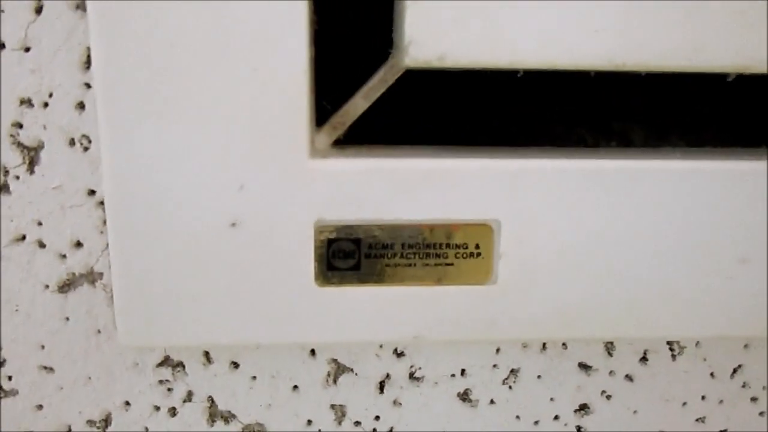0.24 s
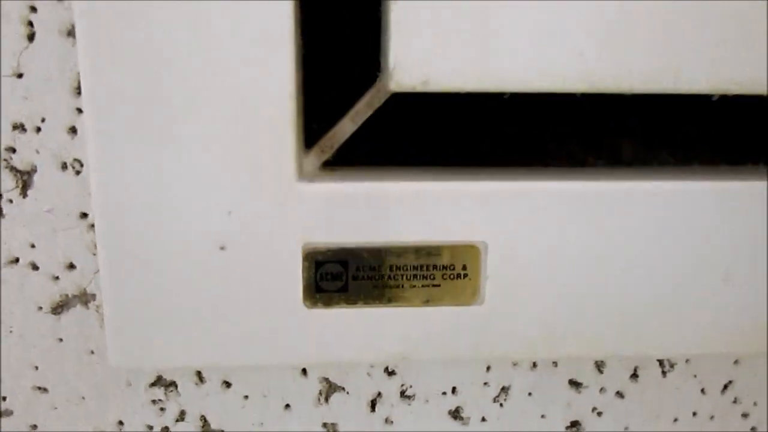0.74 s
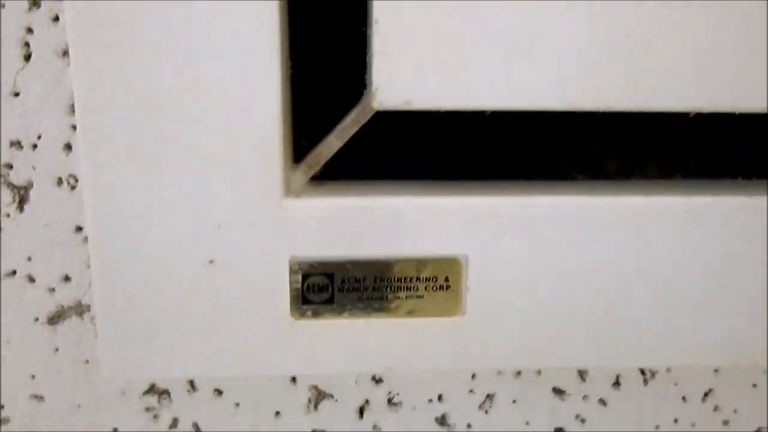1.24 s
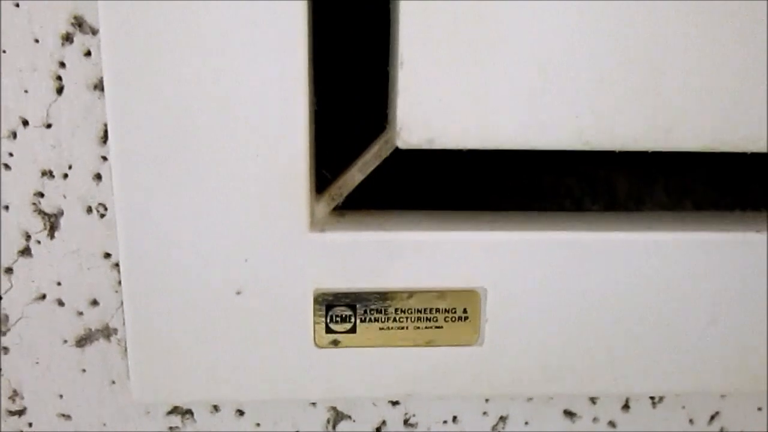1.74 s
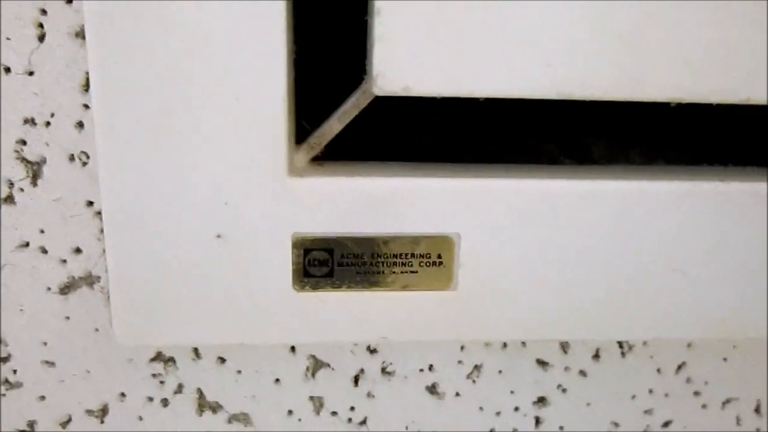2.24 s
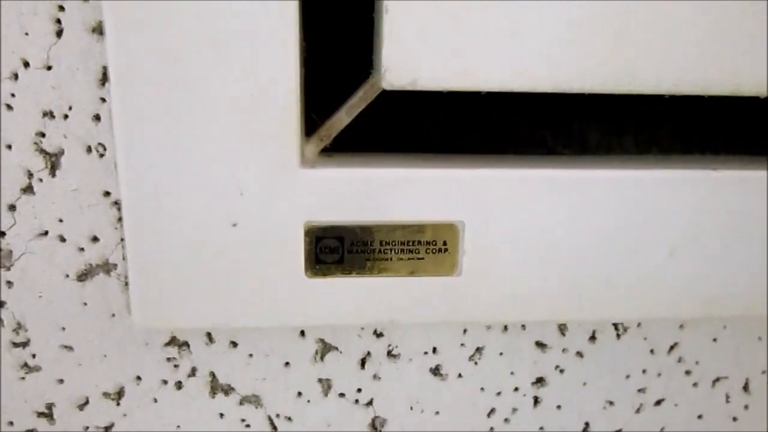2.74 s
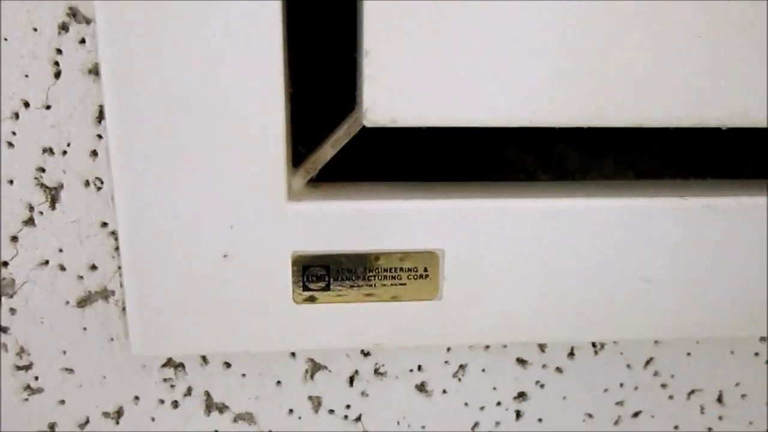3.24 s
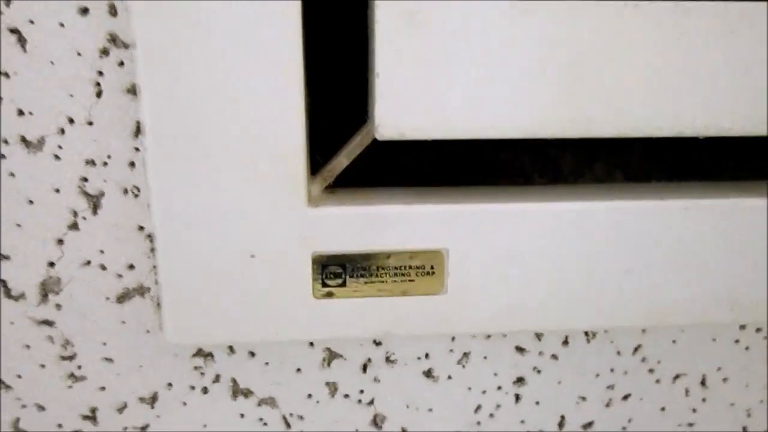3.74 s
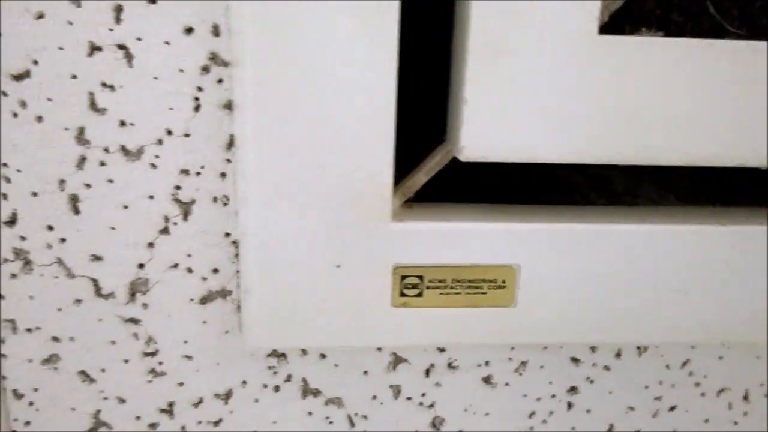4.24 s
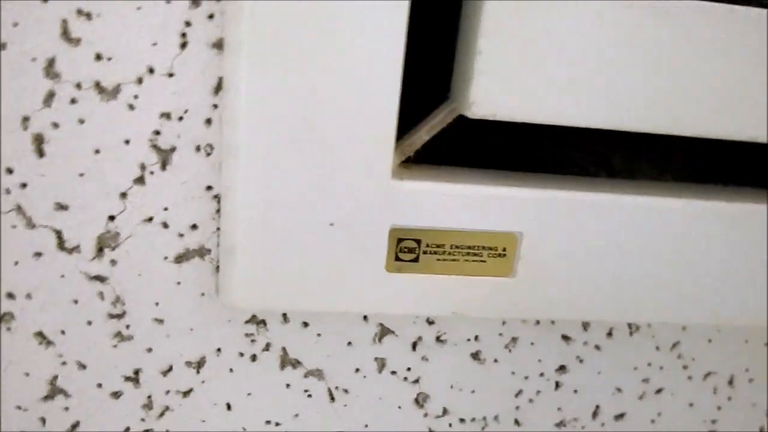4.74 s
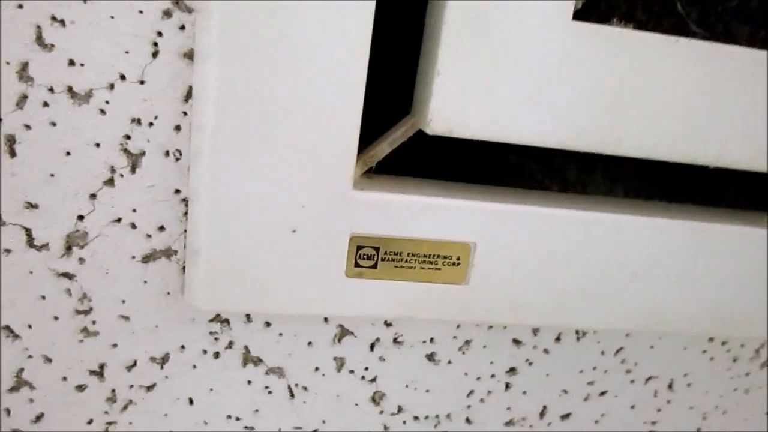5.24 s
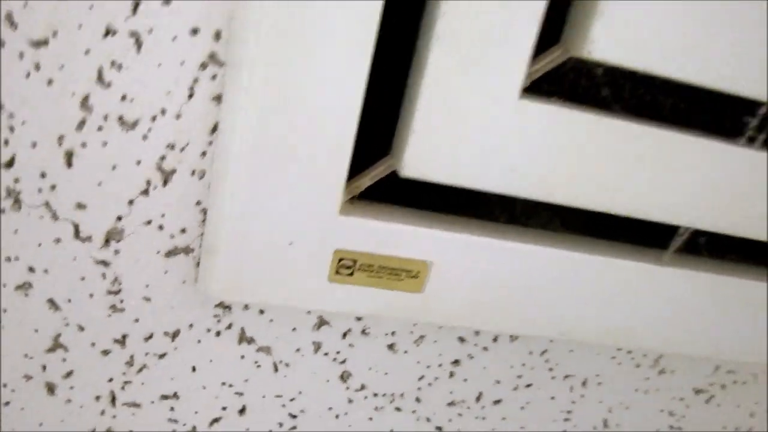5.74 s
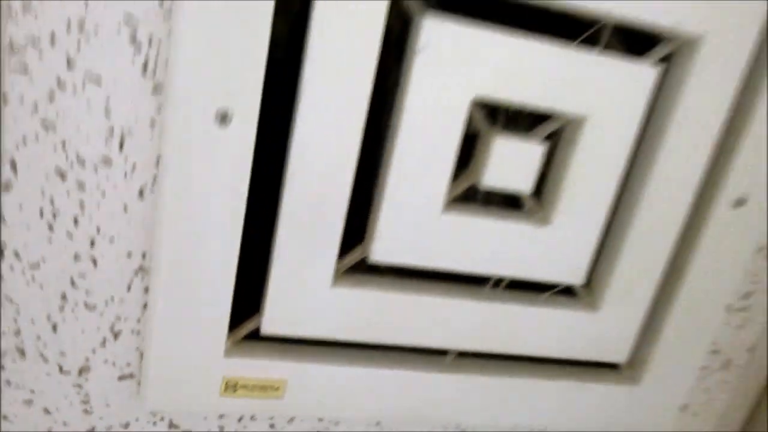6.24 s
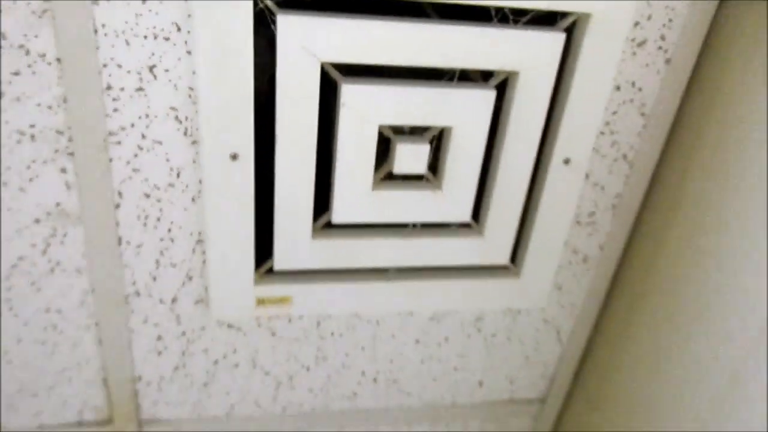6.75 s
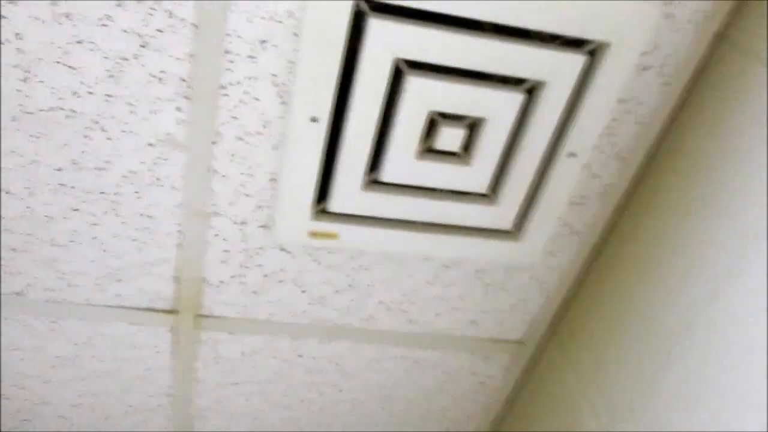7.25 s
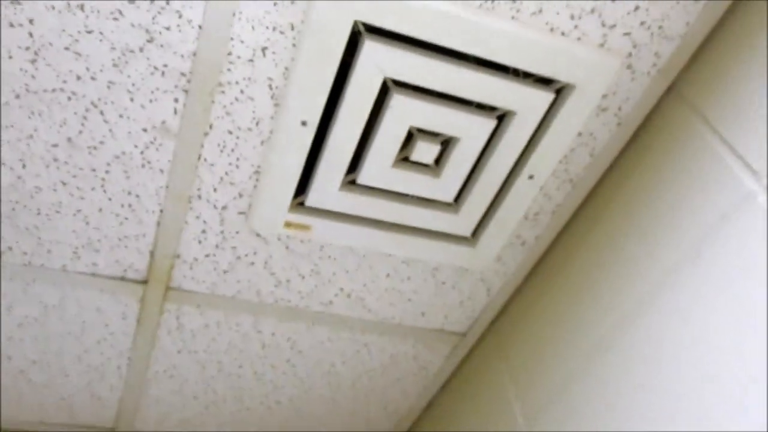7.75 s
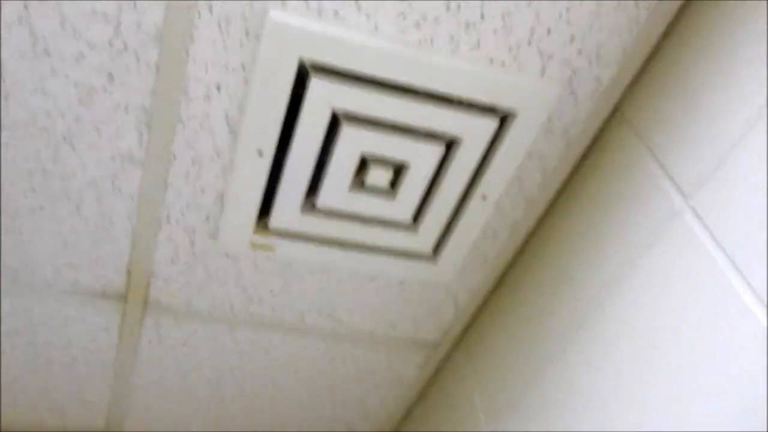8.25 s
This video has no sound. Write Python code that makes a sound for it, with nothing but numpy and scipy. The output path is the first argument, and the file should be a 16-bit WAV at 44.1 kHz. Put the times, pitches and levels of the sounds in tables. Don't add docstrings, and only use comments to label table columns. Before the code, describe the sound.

From 0 s an exhaust fan is already running at constant speed, close to a hand-held camera microphone. A strong low hum near 120 Hz dominates, with deeper rotation tones around 26 turns per second giving a rough, throbbing flutter. Broad low air rush and a softer grille-coloured hiss surround it. A loose metal part rattles faintly every turn, too fast to count; it stirs at 2.9 s, jolts hardest around 3.4 s, then settles by about 4.2 s. A very faint high whine sits above. From 6 s the camera retreats: small clicks, a bright scrape with a low thump near 6.14 s, more ticks around 6.4 s. Sharp clicks cluster from 6.95 to 7.5 s, loudest at 7.12 s, after which everything ducks slightly and slowly recovers. Air and rattle are duller further off; light rubs and taps continue to 8.4 s, the hum never stopping.

```python
import sys
import numpy as np
from scipy import signal
from scipy.fft import rfft, irfft, next_fast_len
from scipy.io import wavfile
from scipy.ndimage import map_coordinates

SR = 44100
rng = np.random.default_rng(int(sys.argv[2]) if len(sys.argv) > 2 else 0)


def volts_from_decibels(level):
    exponent = np.asarray(level, float) / 20
    return 10 ** exponent


def inscribe(sig):
    pcm = np.round(np.clip(np.atleast_2d(sig).T, -1, 1) * 32767)
    wavfile.write(sys.argv[1], SR, pcm.astype(np.int16))


N = 374850
PULL_HZ = 120.04


def unit(x):
    return x / np.sqrt(np.mean(x ** 2) + 1e-20)


def along(points, hz):
    f, value = np.transpose(points)
    return np.interp(np.log(hz + 1), np.log(f + 1), value)


def curve(points, step=1):
    s, value = np.transpose(points)
    return np.interp(np.arange(0, N, step) / SR, s, value)


def wobble(rate, size=N, step=1):
    knots = rng.standard_normal(int(N * rate / SR) + 4)
    return map_coordinates(knots, [np.arange(size) * step * rate / SR])


def filtered(x, response):
    size = x.shape[-1]
    padded = next_fast_len(size + min(size, 8192))
    spectrum = rfft(x, padded) * response(np.fft.rfftfreq(padded, 1 / SR))
    return irfft(spectrum, padded)[..., :size]


def ringing(hz, width_hz):
    return lambda f: 1j * f * width_hz / (hz * hz - f * f + 1j * f * width_hz + 1e-9)


# t/s, rate/(turns per s)
SHAFT_SPEED = [(0, 25.81), (1, 25.845), (2, 25.862), (3, 25.862), (4, 25.847), (5, 25.821), (6, 25.788),
               (7, 25.748), (8.5, 25.69)]


def turns():
    return np.cumsum(curve(SHAFT_SPEED)) / SR - 0.094


# t/s, share of the way 0-1
AWAY = [(0, 0.01), (3.5, 0.01), (5.8, 0.09), (6.4, 0.3), (7.05, 0.77), (7.25, 0.83), (7.8, 0.97),
        (8.5, 0.8)]


def distance():
    return np.clip(curve(AWAY), 0, 1)


# t/s, level/dB
HUM = [(0, -15.5), (2.5, -15.5), (4, -16), (5.9, -17.5), (6.7, -15.5), (8.5, -15.5)]
# t/s, loss as level/dB
FACING = [(0, 0), (3, 0), (5.9, -0.5), (6.3, -1), (6.6, -4), (7.1, -3), (7.7, -1.5), (8.2, -5), (8.5, -6)]
ORDER_NEAR = [-38, -44.5, -32, -49, -47, -48.5, -50, -39, -43.5, -36, -40.5, -52, -48, -59, -50, -48, -53.5,
              -51, -61, -52, -56, -51, -43.5, -46.5, -46.5]
ORDER_FAR = [-36, -49, -33.5, -50, -49, -53, -52, -40.5, -50, -43.5, -44.5, -60, -51, -61, -60, -37.5, -52,
             -55, -57, -67, -54, -45.5, -66, -69, -57]
SIDE_NEAR = [
    [-68, -59, -45.5, -41.5, -89, -36, -44.5, -60, -65, -41.5, -44.5],
    [-38, -73, -53, -40, -26.5, -35, -45.5, -34.5, -44.5, -44.5, -42.5],
    [-44.5, -69, -37.5, -42, -44.5, -40, -43, -45, -56, -59, -54],
    [-48.5, -56, -45, -40.5, -57.5, -49.5, -53, -47, -55, -52, -51.5],
    [-67, -51, -52.5, -53, -55, -61, -48, -42.5, -56, -54, -66],
]
SIDE_FAR = [
    [-58, -62, -44, -49, -89, -54, -41, -67, -43, -73, -72],
    [-54, -56, -41, -35.5, -34.5, -66, -55, -43.5, -40, -49, -63],
    [-41, -47, -46.5, -55, -43.5, -63, -50, -52, -55, -66, -44],
    [-40, -54, -59, -44.5, -50, -48, -57, -56, -58, -58, -68],
    [-69, -56, -56, -70, -54, -57, -67, -73, -77, -73, -66],
]
# f/Hz, width/Hz, lift as level/dB
HALFWAY_MODES = [
    (26, 20, -8),
    (284, 10, 5.5),
    (310, 8.4, 10),
]


def motor():
    coarse = 16
    away = distance()[::coarse]
    shaft = turns()[::coarse]
    pull = PULL_HZ * np.arange(0, N, coarse) / SR
    overtone_db = -0.5 + 0.48 * curve(FACING, coarse)

    def line(cycles, near_db, far_db):
        hz = (cycles[-1] - cycles[0]) * SR / N
        mode_db = sum(db * abs(ringing(top, width)(hz)) ** 2 for top, width, db in HALFWAY_MODES)
        level_db = near_db + away * (far_db - near_db)
        level_db = level_db + mode_db * np.sin(np.pi * away) ** 2
        level_db = level_db + 0.6 * wobble(1.545, len(pull), coarse)
        return volts_from_decibels(level_db) * np.cos(2 * np.pi * (cycles + rng.random()))

    lines = np.zeros(len(pull))
    for order, (near_db, far_db) in enumerate(zip(ORDER_NEAR, ORDER_FAR), 1):
        lines += line(order * shaft, near_db, far_db)
    for multiple, (near_row, far_row) in enumerate(zip(SIDE_NEAR, SIDE_FAR), 1):
        for order, (near_db, far_db) in enumerate(zip(near_row, far_row), -4):
            lines += line(multiple * pull + order * shaft, near_db, far_db)
    hum = volts_from_decibels(curve(HUM, coarse)) * np.cos(2 * np.pi * (pull + 0.48))
    tones = hum + volts_from_decibels(overtone_db) * lines
    return np.sqrt(2) * signal.resample_poly(tones, coarse, 1, window=("kaiser", 12))[:N]


# f/Hz, level/dB per Hz
DUCT_RUSH = [(20, -34), (45, -20), (100, -2), (220, -2), (330, -3.5), (470, -9.5), (650, -3.5), (800, -6.5),
             (980, -9.5), (1500, -33.5), (3000, -55)]
# f/Hz, level/dB per Hz
HISS_NEAR = [(500, -17), (1000, -3), (1600, -4), (2000, -4.5), (3000, -7.5), (5000, -13), (7200, -21.5),
             (10000, -25), (14800, -34), (15400, -53.5)]
HISS_FAR = [(500, -19), (1000, 1), (1600, -3), (2200, -6), (3000, -12.5), (5000, -18), (7200, -20),
            (10000, -22), (14800, -29), (15400, -51)]
# f/Hz, width/Hz, lift as level/dB
GRILLE = [(874, 67, 11.5), (1320, 95, 7.5), (1660, 80, -4.5), (1726, 83, 6), (1965, 73, 5), (2660, 39, 6),
          (3210, 29, 7), (4330, 68, 8), (6450, 130, -1), (6700, 230, 6.5), (8250, 650, 6), (12300, 200, 6)]


def air():
    loss_db, away = curve(FACING), distance()
    rush_db = -33.5 + loss_db
    hiss_db = -47 + 0.63 * loss_db + 4.0

    def grille_db(f):
        return sum(db * abs(ringing(hz, width)(f)) ** 2 for hz, width, db in GRILLE)

    rush = unit(filtered(rng.standard_normal(N), lambda f: volts_from_decibels(along(DUCT_RUSH, f))))
    near = unit(filtered(rng.standard_normal(N), lambda f: volts_from_decibels(along(HISS_NEAR, f) + grille_db(f))))
    far = unit(filtered(rng.standard_normal(N), lambda f: volts_from_decibels(along(HISS_FAR, f))))
    hiss = np.sqrt(1 - away) * near + np.sqrt(away) * far
    return volts_from_decibels(rush_db + 0.41 * wobble(12)) * rush + volts_from_decibels(hiss_db + 0.78 * wobble(12)) * hiss


LOOSE_DB = -59.5
# t/s, lift as level/dB, hold/s
SHAKES = [
    (0, 0, 0.37),
    (2.927, 3.5, 0.1),
    (3.373, 10, 0.015),
    (3.437, 7, 0.067),
    (3.6, 2.5, 0.26),
    (3.9, 2.5, 0.2),
    (7.9, 2.5, 0.14),
]


def loose():
    rise_s, settle_s, far_db = 0.015, 0.084, -7.5
    t = np.arange(N) / SR
    lifts = []
    for s, db, hold in SHAKES:
        rise = np.clip((t - s) / rise_s + 1, 0, 1)
        lifts.append(db * rise * np.exp(-np.maximum(t - s - hold, 0) / settle_s))
    return LOOSE_DB + np.max(lifts, axis=0) + far_db * curve(AWAY)


# place in the turn 0-1, favoured phase of the pull 0-1, its sway as level/dB,
# ring f/Hz, ring width/Hz, ring level/dB, fizz level/dB
CONTACTS = [
    (.74, .3, -2, 8400, 900, -3, -3),
    (.8, 0.26, 10, 5550, 300, 8.5, -3.5),
    (.83, 0.4, 3.5, 1900, 159, 19.5, -11),
    (.87, 0.52, 1, 4370, 150, 15.5, -10),
    (.94, .55, 0.5, 710, 202, 26, -3.5),
    (.99, 0.7, 4.5, 2660, 200, 5.5, -4.5),
    (1.07, 0.85, 2.5, 6000, 900, -5.5, 6.5),
    (1.13, 0.3, 3, 1840, 250, 14, -6),
]
# f/Hz, level/dB per Hz
FIZZ = [(2000, -5), (5500, -0.5), (6700, -1), (7300, -8.5), (8500, 0.5), (9500, -3.5), (10700, -11),
        (12200, -3), (13200, -9), (14400, -6), (15400, -19)]


def rattle():
    late_db = 1.5
    angle, loose_db = turns(), loose()
    count, lag = int(angle[-1]), np.arange(1200)
    t = lag / SR
    burst = volts_from_decibels(-60 * t / 0.011) + volts_from_decibels(-16 - 60 * t / 0.066)
    burst = burst * (1 - np.exp(-t / 0.0003))
    rings, fizz = np.zeros((2, N + len(lag)))
    for place, phase, sway_db, hz, width_hz, ring_db, fizz_db in CONTACTS:
        jitter, chance = rng.standard_normal((2, count))
        strike_turn = np.arange(-1, count - 1) + place + 0.016 * jitter
        at = np.clip(np.searchsorted(angle, strike_turn), 0, N - 1)
        force_db = sway_db * np.cos(2 * np.pi * (PULL_HZ * at / SR - phase)) + 1.6 * chance
        force_db = force_db + late_db * (place - 0.9) * np.maximum(loose_db[at] - LOOSE_DB, 0)
        blows = volts_from_decibels(force_db)[:, None] * burst * rng.standard_normal((count, len(lag)))
        where = (at[:, None] + lag).ravel()
        rung = filtered(blows, ringing(hz, width_hz))
        rings += volts_from_decibels(ring_db) * np.bincount(where, rung.ravel(), len(rings))
        fizz += volts_from_decibels(fizz_db) * np.bincount(where, blows.ravel(), len(fizz))
    panel_db = 0.63 * (loose_db + 60.5) - 39.5 - 8 * curve(AWAY)
    fizz = filtered(fizz, lambda f: volts_from_decibels(along(FIZZ, f)))
    return volts_from_decibels(panel_db) * rings[:N] + volts_from_decibels(loose_db + 19) * fizz[:N]


# f/Hz, level/dB rms
WHINE = [
    (11795, -81),
]


def whine():
    t = np.arange(N) / SR
    return sum(volts_from_decibels(db + 2 + 3.3 * wobble(8)) * np.sin(2 * np.pi * hz * t + 2 * wobble(12)) for hz, db in WHINE)


# t/s, peak level/dB, low part level/dB, high part level/dB
CLICKS = [(6.0337, -38, -8, -17), (6.0847, -28, -4.5, -12), (6.167, -29.5, -6, -21), (6.3993, -34, -29, 5),
          (6.4034, -37, -26, 2), (6.4104, -48, -7, -3), (6.4144, -53, -10, -2), (6.4552, -28, -16, -9),
          (6.5405, -34, 3, -21.5), (6.9544, -15.5, -8, -2), (7.017, -40, 2.5, -10),
          (7.0756, -31.5, -9, -12.5), (7.1216, -6.5, -19.5, -37), (7.1422, -30, -6, -15),
          (7.2075, -27, -18, -13), (7.217, -32, -1.5, -17), (7.2454, -38, -7, -14.5),
          (7.2535, -12.5, -13, -18), (7.2596, -33.5, -6.5, 0), (7.3132, -13.5, -14, 3),
          (7.3284, -25, -18, -17), (7.5184, -18.5, -21, -21), (7.652, -41, -4, -15),
          (7.6924, -36, -11, -22), (7.9953, -33, -9, -11), (8.026, -39.5, -3, -10), (8.3682, -25, -17, -18),
          (8.389, -26.5, -20, -20)]


def clicks():
    first_blow, t60_s = 16, 0.0092
    bands = [(1500, 1920), (4300, 6300), (9500, 5300)]  # (f/Hz, width/Hz)
    out, t = np.zeros(N + SR), np.arange(2000) / SR
    for s, db, low_db, high_db in CLICKS:
        snap = rng.standard_normal(2000) * volts_from_decibels(-60 * t / t60_s)
        snap[0] += first_blow
        start = round((s + 0.001) * SR)
        for band, sign, part_db in zip(bands, (-1, 1, -1), (low_db + 11, 5, high_db + 6)):
            part = filtered(sign * snap, lambda f: ringing(*band)(f) ** 2)
            out[start:start + 2000] += volts_from_decibels(db + part_db) * part / abs(part).max()
    return out[:N]


# peak t/s, swell/s, level/dB rms,
# centre f/Hz, width/Hz
SCRAPES = [
    (6.087, 0.0053, -31.5, 4500, 5800),
    (6.145, 0.014, -18, 7850, 1300),
    (6.146, 0.028, -26.5, 3860, 2000),
    (6.146, .048, -27.5, 1200, 1300),
    (6.146, .03, -22, 200, 350),
    (6.146, 0.017, -31.5, 2500, 500),
    (6.146, 0.044, -36, 8400, 3500),
    (7.125, .0027, -35, 3600, 3400),
    (7.259, 0.23, -38.5, 4180, 9400),
]
# peak t/s, swell/s, level/dB rms, centre f/Hz, width/Hz
SLIDES = [
    (6.41, 0.23, -50, 7900, 5600),
    (7.21, 0.024, -42, 6800, 2300),
    (7.252, .012, -31, 1200, 800),
    (7.285, 0.027, -44, 6900, 300),
    (7.47, 0.061, -49, 5000, 4000),
    (7.655, .012, -39, 1700, 700),
    (7.9, 0.044, -43, 2190, 1500),
    (8.37, .1, -51, 7100, 7000),
]


def rubs():
    out, t = np.zeros(N + SR), np.arange(-SR // 4, SR // 4) / SR
    strokes = [(0.003 + 0.11 * row[1], *row) for row in SCRAPES]
    strokes += [(0.65 * row[1], *row) for row in SLIDES]
    for fall, s, rise, db, hz, width_hz in strokes:
        shape = np.exp(np.where(t < 0, 2 * t / rise, -(t / fall) ** 2))
        grit = volts_from_decibels(3.7 * wobble(500, len(t))) * rng.standard_normal(len(t))
        stroke = unit(shape * filtered(grit, lambda f: ringing(hz, width_hz)(f) ** 2))
        start = round((s + t[0]) * SR)
        out[start:start + len(t)] += volts_from_decibels(db) * np.sqrt(np.mean(shape ** 2)) * stroke
    return out[:N]


def thump():
    at_s, peak_db, hz, t60_s = 6.138, -15, 78, 0.18
    after = np.maximum(np.arange(N) / SR - at_s, 0)
    return -volts_from_decibels(peak_db - 60 * after / t60_s) * np.sin(2 * np.pi * hz * after)


def scene():
    fan = motor() + air() + rattle()
    hands = clicks() + rubs() + thump()
    return (fan + whine() + hands)[None]


def low_pass(x):
    return signal.sosfilt(signal.butter(12, 15230, fs=SR, output="sos"), x)


def record(dry):
    duck_at_s, duck_db, hold_s, recovery_s, top_hz = 7.1245, -4, 0.3, 0.95, 15050
    after = np.arange(N) / SR - duck_at_s
    back = np.clip((after - hold_s) / recovery_s, 0, 1)
    recovered = back * back * (3 - 2 * back)
    gain_db = duck_db * np.clip(after / 0.003, 0, 1) * (1 - recovered)
    cut = filtered(dry * volts_from_decibels(gain_db), lambda f: 1 / (1 + (f / top_hz) ** 90))
    return low_pass(np.clip(cut, -1, 1))


dry = scene()
out = record(dry)
inscribe(out)
```